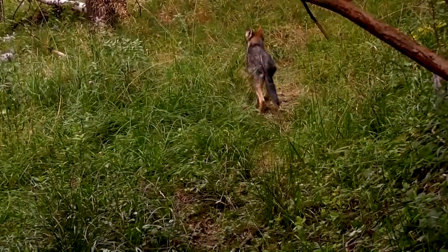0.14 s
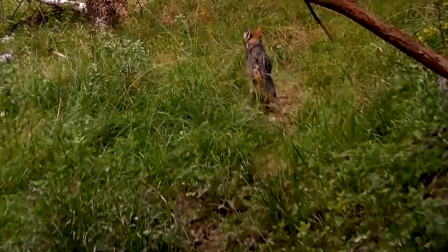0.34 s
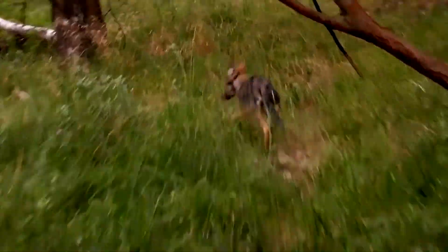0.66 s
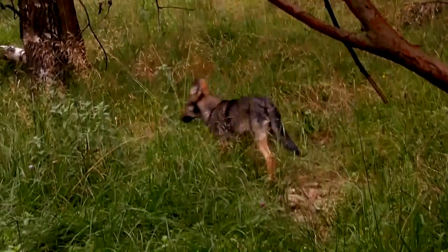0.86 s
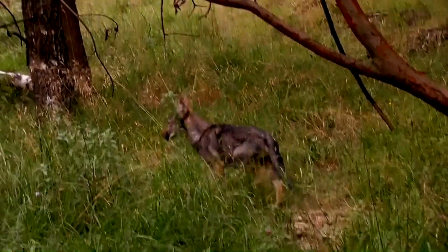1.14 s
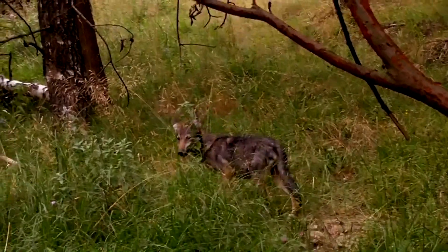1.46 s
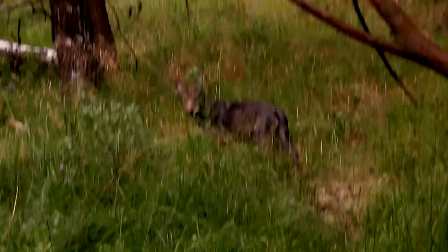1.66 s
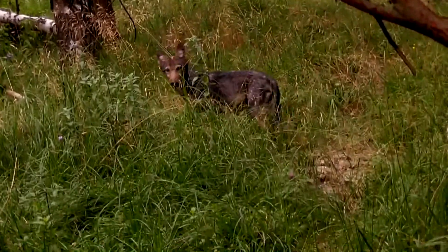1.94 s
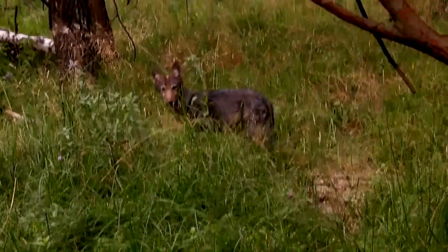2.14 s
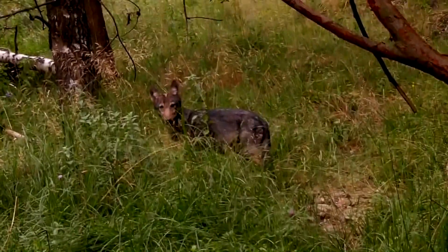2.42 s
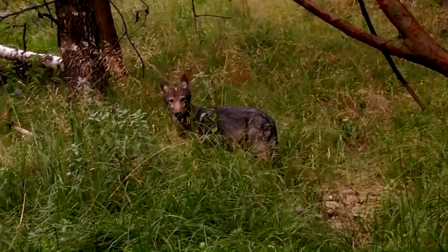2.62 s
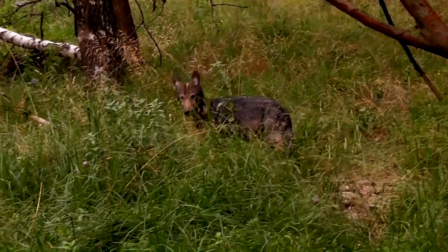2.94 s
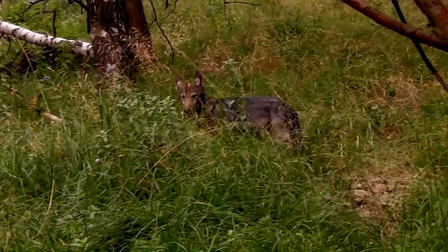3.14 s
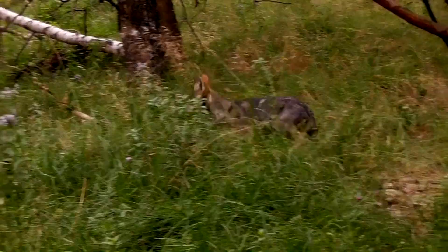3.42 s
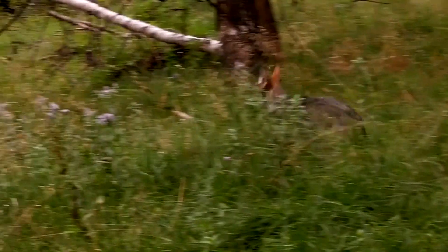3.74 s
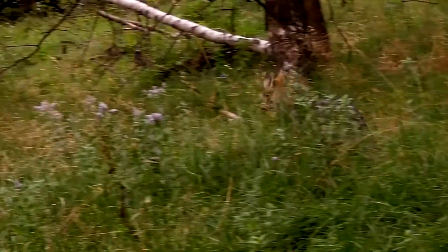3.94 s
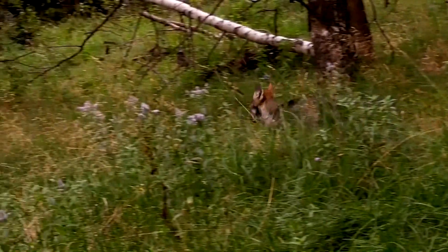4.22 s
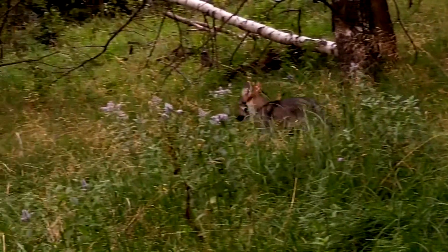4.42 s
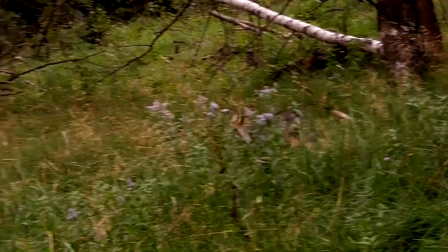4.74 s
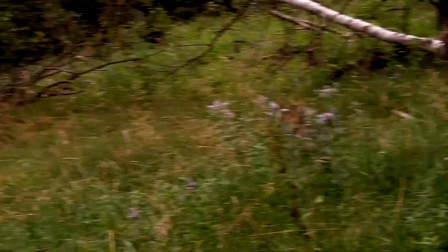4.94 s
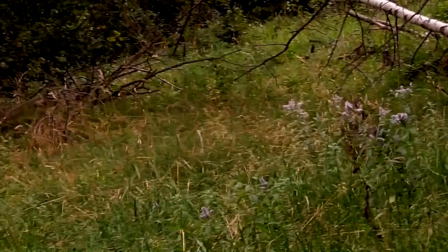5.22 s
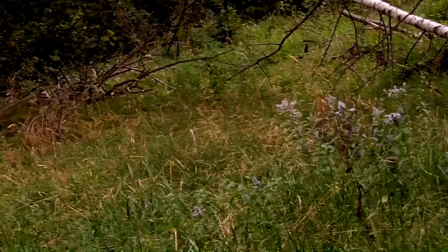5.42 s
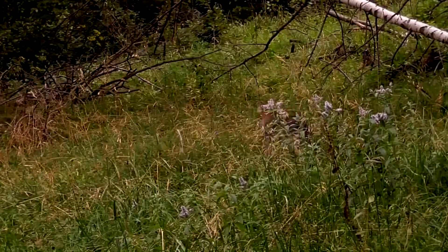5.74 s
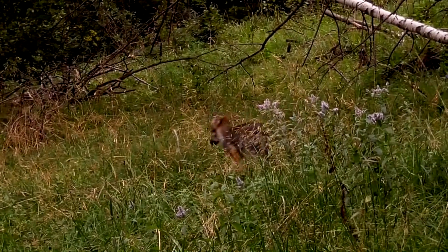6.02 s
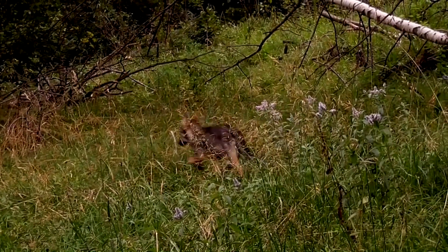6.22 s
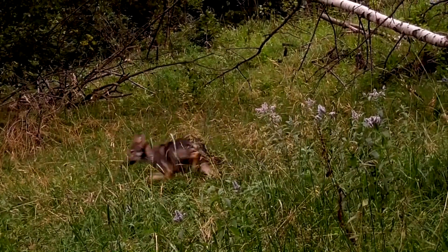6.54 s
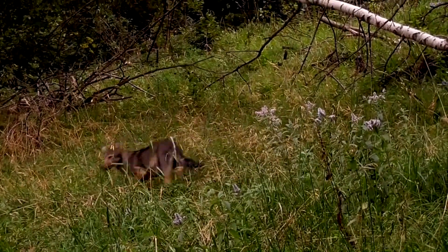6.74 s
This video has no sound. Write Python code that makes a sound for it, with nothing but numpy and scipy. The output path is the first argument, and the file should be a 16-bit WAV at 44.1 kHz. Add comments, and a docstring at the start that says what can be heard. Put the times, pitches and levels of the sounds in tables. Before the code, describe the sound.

In a quiet forest clearing, a small wild dog moves through long grass. Dry stems crackle, then one twig snaps sharply and loudly near one and a half seconds, with a much softer snap later. Brief bird chirps follow, and the grass swishes grow fuller. A hand-held stereo camera microphone adds faint hiss, dull bumps, low rumble and rapid lens-motor ticking.

```python
"""Quiet air and a thin bird whistle open a forest clearing; then dry stems start to crack in long grass.
A small wild dog wades through: strides are swelling grains of noise, cracks and two close twig snaps
are decaying modes under bursts of noise. A hand-held camera adds rumble and bumps (filtered noise, low
modes), lens motor ticks (struck modes) and a wavering hum; birds are gliding tones and hoarse notes."""
import sys
import numpy as np
from scipy import signal
from scipy.fft import rfft, irfft, next_fast_len
from scipy.io import wavfile
from scipy.ndimage import uniform_filter1d

SR = 44100
rng = np.random.default_rng(int(sys.argv[2]) if len(sys.argv) > 2 else 0)


def transcribe(signal):
    """Save signal, clipped to [-1, 1], as a 16-bit WAV file at the path in sys.argv[1]."""
    frames = np.atleast_2d(signal).T
    limited = np.clip(frames, -1, 1)
    pcm = np.round(limited * 32767).astype(np.int16)
    wavfile.write(sys.argv[1], SR, pcm)


N = 303035
T = np.arange(N) / SR
SIDES = np.array([[1], [-1]])  # left, right


def undb(db):
    """Turn decibels into an amplitude factor."""
    return 10 ** (np.asarray(db) / 20)


def unit(x):
    """Scale a signal to an RMS of one."""
    return x / np.sqrt(np.mean(x ** 2))


def on_log(hz, table):
    """Read an (f/Hz, value) table along a log-frequency axis."""
    f, v = np.transpose(table)
    return np.interp(np.log(np.maximum(hz, 1)), np.log(f), v)


def walk(rate):
    """Random levels held 1 / rate s and smoothed twice; spread near 1."""
    k = int(SR / rate)
    held = np.repeat(rng.standard_normal(N // k + 1), k)
    return 1.5 * uniform_filter1d(uniform_filter1d(held, k), k)[:N]


def colour(x, table):
    """Shape a signal by a spectrum that is silent outside its table."""
    size = next_fast_len(N)
    hz = np.arange(size // 2 + 1) * SR / size
    inside = (hz > table[0][0]) & (hz < table[-1][0])
    return irfft(rfft(x, size) * undb(on_log(hz, table)) * inside, size)[..., :N]


def spread(mid, side, like):
    """Make left and right of a given correlation from two independent noises."""
    return np.sqrt(1 + like) * mid + np.sqrt(1 - like) * side * SIDES


def pair(like, grain_db=0., share=1.):
    """Stereo noise of given correlation; a share of its samples are grains, stronger by grain_db."""
    x = rng.standard_normal((2, N))
    x *= np.where(rng.random(N) < share, undb(grain_db), 1)
    return spread(*x, like)


def decay(t, t60):
    """Exponential fade that falls 60 dB in t60 seconds."""
    return np.exp(-np.log(1000) * t / t60)


def ring(hz, t60, turn, length=.12):
    """One decaying mode that starts at the given fraction of its cycle."""
    t = np.arange(int(length * SR)) / SR
    return np.sin(2 * np.pi * (hz * t + turn)) * decay(t, t60)


def add(out, x, s):
    """Mix x into out from time s on."""
    i = int(s * SR)
    out[:, i:i + x.shape[-1]] += x[..., :N - i]


# Spectrum of the blades' hiss: (f/Hz, relative level/dB per Hz)
BLADE_SPECTRUM = [(4500, -20), (6500, -11), (8200, -2), (10000, 1), (12200, -3.5), (14500, -14)]
# Spectrum of the stalks' rustle: (f/Hz, relative level/dB per Hz)
STALK_SPECTRUM = [(600, -14), (1300, -8.5), (2300, -4.5), (3000, -7.5), (4600, -2.5), (6300, -7.5),
                  (9000, -15.5)]
# Strides through the grass: (peak t/s, swell t/s, fade t/s, blade hiss level/dB, stalk rustle level/dB)
STRIDES = [(.26, 0.11, .16, -66.5, -79), (.6, 0.063, 0.11, -72.5, -76), (.86, .06, 0.044, -70, -71),
           (1.17, 0.11, 0.14, -71, -72.5), (1.67, 0.07, 0.034, -75, -74.5), (1.84, 0.084, 0.12, -70, -69),
           (1.95, 0.028, 0.084, -61, -58.5), (2.37, 0.059, 0.088, -74, -71), (3.12, .04, 0.048, -69, -92),
           (3.35, .08, 0.11, -71, -80), (3.68, .03, .12, -64, -73.5), (4.0, 0.033, 0.083, -59, -68),
           (4.21, 0.027, 0.065, -59.5, -73), (4.34, 0.086, 0.076, -60, -67), (4.69, .12, 0.072, -58, -65.5),
           (4.93, 0.08, 0.058, -58.5, -66), (5.27, 0.1, 0.03, -65, -67.5), (5.57, 0.041, 0.033, -64, -69),
           (5.86, .025, 0.092, -60, -67.5), (6.15, 0.063, 0.059, -60, -67), (6.5, 0.047, 0.15, -65, -71),
           (6.63, 0.028, .05, -58.5, -67.5), (6.82, 0.15, 0.12, -60, -65.5)]
# Grass settling between strides: (t/s, blade hiss level/dB, stalk rustle level/dB)
SETTLING = [(0, -70, -75.5), (.9, -76.5, -76), (1.5, -86.5, -87), (2.1, -75, -78), (2.9, -89.5, -90),
            (3.8, -72, -80), (5.0, -71, -72.5), (6.0, -70.5, -71.5), (6.87, -69, -91)]


def grass():
    """Blades hiss high, stalks rustle lower: tiny scrapes that swell and fade with each stride."""
    s, *rest_db = np.transpose(SETTLING)
    power = np.array([undb(np.interp(T, s, db)) ** 2 for db in rest_db])
    for peak_s, swell_s, fade_s, *db in STRIDES:
        # a bell-shaped swell, with its own width on each side of the peak
        away = (T - peak_s) / np.where(T < peak_s, swell_s, fade_s)
        power = power + undb(db)[:, None] ** 2 * np.exp(-2 * away ** 2)
    blades = unit(colour(pair(0.46, grain_db=13, share=0.027), BLADE_SPECTRUM))
    blades = blades * undb(1.4 * walk(21))
    stalks = unit(colour(pair(0.76, grain_db=14, share=0.0055), STALK_SPECTRUM))
    stalks = stalks * undb(1.8 * walk(25))
    return np.sqrt(power[0]) * blades + np.sqrt(power[1]) * stalks


# Stem cracks, crackle levels taken before the band filter: (t/s, left minus right level/dB,
# low ring level/dB, ring f/Hz, middle crackle level/dB, middle f/Hz, high crackle level/dB)
CRACKS = [(.16, 0, -39, 610, -47, 3130, -60), (.206, -9, -45, 950, -62.5, 4900, -57.5),
          (.285, 6, -49, 1260, -50, 2130, -53), (.327, 2, -60.5, 877, -49, 2200, -53),
          (.53, -4, -44, 920, -60, 3830, -59), (.841, 3, -43.5, 914, -46.5, 2200, -42),
          (0.878, 5, -50.5, 908, -47.5, 2060, -47), (1.015, 0, -64, 900, -64, 4000, -46),
          (1.069, 2, -55, 630, -52, 2530, -42), (1.092, 0, -62, 900, -54.5, 4130, -59),
          (1.123, 4, -43, 930, -53, 2550, -50.5), (1.172, 2, -45, 947, -37.5, 5030, -55),
          (1.201, 1, -47, 880, -56, 5190, -50), (1.325, -3, -65, 885, -68, 5050, -40.5),
          (1.332, 3, -38.5, 890, -48, 2230, -58), (1.441, 0, -36.5, 890, -48, 2330, -28),
          (1.529, -1, -60, 452, -61.5, 3900, -50), (1.545, -6, -43, 651, -59.5, 2130, -56.5),
          (1.637, 0, -66, 764, -59, 4090, -46), (1.685, -1, -49, 580, -53.5, 5070, -53),
          (1.761, 3.5, -39.5, 873, -42, 2260, -36), (1.929, 4, -47, 940, -48, 5200, -29),
          (2.064, 0, -54, 468, -57, 4010, -47), (2.1, 0.5, -45.5, 840, -52.5, 2380, -58),
          (2.365, 5, -57, 744, -48.5, 3080, -53), (2.423, 10, -55, 900, -53.5, 3620, -55),
          (2.542, -1.5, -49, 806, -64, 2420, -62), (2.705, 0, -66, 840, -54, 3060, -48),
          (2.787, -2.5, -46, 565, -62, 4570, -59), (3.071, -2, -45.5, 840, -71, 4940, -53),
          (3.335, 3, -50.5, 1040, -49, 2160, -50), (3.973, 0, -67, 886, -60, 5400, -42),
          (5.149, 0, -42.5, 544, -58, 4550, -57), (5.277, -10, -45.5, 970, -58, 4500, -55),
          (5.295, -7, -48, 1150, -68, 2200, -60), (5.34, 1, -43, 857, -54, 2140, -54),
          (5.385, -1, -41, 545, -53, 2500, -55), (5.508, 0, -31.5, 860, -42, 2540, -64),
          (5.547, -11, -51, 780, -61, 5190, -58), (5.651, -8, -45.5, 880, -66, 2170, -56),
          (5.69, -4, -41, 754, -50, 2480, -57), (5.704, 1, -42, 790, -51.5, 3900, -60),
          (5.754, -5, -42.5, 600, -54.5, 3450, -59), (6.23, -7, -45.5, 900, -44.5, 3650, -41.5),
          (6.704, -9, -43, 870, -54, 3900, -52)]
# Low modes of a stem: (multiple of its ring pitch, t60/s, relative level/dB)
STEM_MODES = [(1, 0.034, -1), (.62, 0.013, -2.5), (1.4, 0.021, -2.5)]
# Middle crackle, then high crackle: (width each side/octaves, t60/s)
CRACKLE_BANDS = [(1, 0.023), (0.43, 0.0097)]
TEAR_S, HIGH_CRACKLE_HZ = 0.00089, 9900  # onset of each crack; centre of the high crackle
WALL_KNOCK_DB = -4.5  # knock against the middle crackle's level


def cracks():
    """Each stem rings low, out of step at the two microphones, under a burst of splitting fibre."""
    out = np.zeros((2, N))
    size = 2048
    chance = rng.random((len(CRACKS), 6))
    fibre = rng.standard_normal((len(CRACKS), 2, 2, size))
    t = np.arange(size) / SR
    rise = np.minimum(t / TEAR_S, 1)
    for crack, c, noise in zip(CRACKS, chance, fibre):
        s, pan_db, low_db, low_hz, middle_db, middle_hz, high_db = crack
        leading = np.sign(c[3] - .5) * SIDES  # which microphone runs ahead in phase
        x = np.zeros((2, size))
        for n, (multiple, t60, db) in enumerate(STEM_MODES):
            turn = c[n] + (0.079 + 0.088 * c[n + 3]) * leading
            x += undb(low_db + db) * ring(low_hz * multiple, t60, turn)[:, :size] * rise
        levels_db, centres_hz = (middle_db, high_db), (middle_hz, HIGH_CRACKLE_HZ)
        for (wide, t60), db, hz, (mid, side) in zip(CRACKLE_BANDS, levels_db, centres_hz, noise):
            sos = signal.butter(2, [hz / 2 ** wide, hz * 2 ** wide], "band", fs=SR, output="sos")
            burst = (mid + .45 * side * SIDES) * rise * decay(t, t60)
            x += undb(db) * signal.sosfilt(sos, burst)
        # the stem wall also knocks briefly at the middle pitch
        x += undb(middle_db + WALL_KNOCK_DB) * ring(middle_hz, .018, c[0])[:size] * rise
        add(out, x * undb(pan_db * SIDES / 2), s)
    return out


# Twig snaps: (t/s, overall level/dB, tear t/s, relative splinter level/dB, splinter t60/s, splinter top f/Hz)
SNAPS = [(1.4295, -5.5, 0.00063, -16, 0.016, 13200), (2.851, -22.5, 0.00047, -11.5, 0.028, 4970)]
# One list of modes for each twig: (f/Hz, t60/s, left relative level/dB, right relative level/dB)
TWIG_MODES = [
    [(110, .12, -44.5, -30), (330, 0.022, -40, -34.5), (436, .05, -41, -30), (630, .025, -24.5, -28),
     (810, 0.031, -7.5, -20), (1006, 0.037, -14.5, -27), (1185, 0.036, -25, -23), (1420, 0.023, -23.5, -26),
     (2290, 0.015, -26, -29), (3100, 0.019, -33, -31), (4036, 0.00616, -0.5, -1.5),
     (5250, 0.0053, -13.5, -15.5), (6040, 0.015, -20.5, -18.5), (7540, 0.0062, -14.5, -16),
     (9210, .006, -1, -3), (11500, 0.0016, -15.5, -0.5), (14900, 0.0036, -16, -11.5)],
    [(500, 0.026, -22, -29), (830, 0.039, -21, -19.5), (1040, 0.033, -10.5, -21), (1350, 0.013, -19, -0.5),
     (2010, 0.03, -12.5, -12.5), (2600, 0.0056, -3, -2), (3280, 0.0075, -21, -4), (4040, 0.011, -1.5, 2),
     (5360, 0.013, -25, -14), (6200, 0.0096, -19, -15), (8200, 0.0066, -18, -10.5),
     (10600, 0.0079, -24, -20)],
]


def snaps():
    """A twig tears through, ringing its modes, and splinters spit in a decaying, flickering noise."""
    out = np.zeros((2, N))
    size = 4096
    t = np.arange(size) / SR
    for (s, db, tear_s, splinter_db, splinter_t60, top_hz), modes in zip(SNAPS, TWIG_MODES):
        x = np.zeros((2, size))
        for (hz, t60, left_db, right_db), turn in zip(modes, rng.random(len(modes))):
            # the two microphones hear each mode a little out of step
            x += undb([[left_db], [right_db]]) * ring(hz, t60, turn + 0.084 * SIDES)[:, :size]
        noise = rng.standard_normal((2, size))
        flicker = undb(5.7 * np.repeat(rng.standard_normal(size // 32), 32))
        mid, side = noise * flicker
        splinter = (mid + .6 * side * SIDES) * decay(t, splinter_t60)
        band = signal.butter(3, [2200., top_hz], "band", fs=SR, output="sos")
        x += undb(splinter_db) * signal.sosfilt(band, splinter)
        x *= np.minimum(2 * t / tear_s, 1)  # full strength halfway through the tear
        # a thin twig sends out little bass
        x = signal.sosfilt(signal.butter(2, 70., "high", fs=SR, output="sos"), x)
        add(out, x * undb(db), s)
    return out


# Hand and feet: (t/s, casing rumble level/dB, shuffle level/dB)
GRIP_LEVELS = [(0, -80, -62.5), (.25, -67, -65.5), (.5, -73, -64.5), (.85, -59.5, -64), (.95, -76, -64.5),
               (1.15, -65.5, -62.5), (1.35, -82, -66), (1.75, -66.5, -66), (1.95, -67, -58.5),
               (2.25, -71, -65.5), (2.4, -68.5, -60.5), (2.65, -69.5, -66), (3.2, -74, -65.5),
               (4.3, -69.5, -67.5), (5.0, -70.5, -65.5), (5.15, -61, -60), (5.3, -59.5, -61),
               (5.55, -66, -60), (5.7, -62, -60.5), (6.2, -75, -66), (6.55, -68, -63), (6.75, -61.5, -58.5),
               (6.87, -64, -60)]
# Spectrum of the casing rumble: (f/Hz, relative level/dB per Hz)
CASING_SPECTRUM = [(25, -25.5), (50, -16), (85, -9.5), (135, -1), (200, 2), (400, -13.5)]
# Spectrum of the shuffling feet: (f/Hz, relative level/dB per Hz)
SHUFFLE_SPECTRUM = [(200, -18.5), (500, 1.5), (900, 1), (1300, -2), (2200, -21)]
# Dull bumps on the casing: (t/s, level/dB, f/Hz, t60/s, left minus right level/dB)
BUMPS = [(.16, -42.5, 143, 0.087, -7), (0.244, -44, 140, 0.059, -7), (.355, -47, 155, 0.081, -10),
         (1.763, -47.5, 132, 0.14, -11), (2.101, -46.5, 133, 0.11, -10), (2.7, -53, 125, 0.11, -12),
         (5.072, -57, 134, 0.28, -13), (5.146, -49.5, 135, 0.23, -17), (5.295, -41, 133.5, 0.21, -12),
         (5.387, -47.5, 116, 0.16, -10), (5.47, -47, 128, 0.14, -9), (5.688, -49, 135, 0.09, -13),
         (6.719, -50, 150, 0.09, -7)]


def grip():
    """The hand rumbles and bumps on the casing nearer the right microphone; feet shuffle in litter."""
    s, rumble_db, shuffle_db = np.transpose(GRIP_LEVELS)
    rumble = unit(colour(pair(0.15), CASING_SPECTRUM)) * undb(2.8 * walk(7.8) - 1.6 * SIDES)
    shuffle = unit(colour(pair(0.049, grain_db=14, share=0.0031), SHUFFLE_SPECTRUM))
    shuffle = shuffle * undb(2.5 * walk(45))
    out = undb(np.interp(T, s, rumble_db)) * rumble + undb(np.interp(T, s, shuffle_db)) * shuffle
    for s, db, hz, t60, pan_db in BUMPS:
        x = ring(hz, t60, 0.074 * SIDES, .3)
        # the casing also rocks at about half the pitch
        x = x + undb(-8.0) * ring(0.55 * hz, t60, 0.18 * SIDES, .3)
        # a soft palm: the push takes 0.8 of a cycle to build
        push = np.minimum(np.arange(x.shape[1]) * hz / (.8 * SR), 1)
        add(out, x * push * undb(db + pan_db * SIDES / 2), s)
    return out


# Lens motor runs: (first step t/s, run end t/s, steps per second)
LENS_RUNS = [(.403, .57, 50), (.604, .89, 25), (.917, .96, 50), (2.417, 6.87, 50)]
# Strength of the steps: (t/s, barrel's low-mode level/dB, barrel's high-mode level/dB)
LENS_LEVELS = [(.4, -57, -55), (.5, -51.5, -56.5), (.72, -49, -53), (.96, -52, -56), (2.4, -58, -60),
               (3.2, -63.5, -72), (3.8, -61.5, -65.5), (4.4, -56.5, -66), (4.9, -52.5, -57),
               (5.4, -56, -66), (5.9, -52, -57), (6.3, -57.5, -64), (6.6, -86, -76)]
# Modes of the lens barrel: (f/Hz, t60/s, relative level/dB)
BARREL_MODES = [(740, 0.0068, 6), (1277, 0.025, -3), (1523, 0.016, 0.5), (2008, 0.0092, -0.5),
                (2200, 0.0071, -12), (3560, 0.0047, 6), (4660, 0.0049, 6), (5800, .003, -2)]
# Phase offset at each microphone, in opposite directions: (low modes [cycles], high modes [cycles])
LENS_SKEW = (.07, 0.12)
LENS_HIGH_HZ = 3000  # modes above this follow the high level


def lens():
    """The focus motor steps in steady runs of uneven strength, each step knocking the lens barrel."""
    times = np.concatenate([np.arange(a, b, 1 / rate) for a, b, rate in LENS_RUNS])
    uneven_db = 1.9 * rng.standard_normal(len(times))
    s, *levels_db = np.transpose(LENS_LEVELS)
    out = np.zeros((2, N))
    for high, level_db in enumerate(levels_db):
        steps = np.zeros(N)
        steps[(times * SR).astype(int)] = undb(np.interp(times, s, level_db) + uneven_db)
        knock = sum(undb(db) * ring(hz, t60, LENS_SKEW[high] * SIDES, .03)
                    for hz, t60, db in BARREL_MODES if (hz > LENS_HIGH_HZ) == high)
        knock *= np.minimum(np.arange(knock.shape[1]) / (0.001 * SR), 1)  # 1 ms onset
        out += signal.fftconvolve(steps[None], knock, axes=1)[:, :N]
    return out


# The motor hums while it runs hard: (t/s, f/Hz, level/dB)
HUM = [(.34, 150, -80), (.37, 159.6, -66), (.48, 192.2, -62.5), (.57, 183.5, -62), (.64, 220, -68),
       (.71, 249, -58), (.76, 199.7, -68), (.81, 165, -62), (.87, 196, -64), (.9, 200, -84)]


def hum():
    """A low tone wavering in pitch and level through the casing, out of step at the two microphones."""
    s, hz, db = np.transpose(HUM)
    turn = np.cumsum(np.interp(T, s, hz) * (1 + 0.04 * walk(39.2))) / SR
    on = (T > s[0]) & (T < s[-1])
    level = np.sqrt(2) * undb(np.interp(T, s, db) + 2.3 * walk(25.6))
    return on * level * np.sin(2 * np.pi * (turn + 0.1 * SIDES))


# Bird whistles, a negative fade grows: (start t/s, length t/s, from f/Hz, to f/Hz, glide t/s,
# starting level/dB, fade/dB per s)
WHISTLES = [(0.042, 0.12, 8400, 7850, 0.068, -69.5, -21), (2.636, .135, 3030, 4610, .042, -64.5, 100),
            (2.648, .028, 5000, 6000, .03, -77, 50), (5.05, .08, 2980, 4630, 0.078, -80, -50)]
# Hoarse falling bird notes: (start t/s, end t/s, from f/Hz, to f/Hz, width f/Hz, level/dB before swell)
RASPS = [(3.04, 3.2, 8200, 6500, 500, -65.5), (3.1, 3.27, 7300, 5400, 450, -71),
         (3.09, 3.28, 5700, 4200, 400, -72), (3.3, 3.33, 7700, 7500, 300, -75)]
WHISTLE_EDGE_S, WHISTLE_FLUTTER_DB = 0.0048, 0  # fade in and out; level flutter (0 = steady)


def birds():
    """Thin gliding whistles and hoarse noise-modulated notes from the trees, with a blur of echoes."""
    out = np.zeros(N)
    flutter_db = WHISTLE_FLUTTER_DB * walk(70)
    for s, length_s, from_hz, to_hz, glide_s, db, fade_db in WHISTLES:
        t = np.clip(T - s, 0, length_s)
        # the glide slows as it nears the held pitch
        hz = from_hz + (to_hz - from_hz) * np.sin(np.pi / 2 * np.minimum(t / glide_s, 1))
        edge = np.minimum(np.minimum(t, length_s - t) / WHISTLE_EDGE_S, 1)
        tone = np.sin(2 * np.pi * np.cumsum(hz) / SR)
        out += edge * np.sqrt(2) * undb(db - fade_db * t + flutter_db) * tone
    for a, b, from_hz, to_hz, wide_hz, db in RASPS:
        u = np.clip((T - a) / (b - a), 0, 1)
        husk = unit(uniform_filter1d(rng.standard_normal(N), int(SR / wide_hz)))
        tone = np.sin(2 * np.pi * np.cumsum(from_hz + (to_hz - from_hz) * u) / SR)
        out += undb(db) * np.sin(np.pi * u ** 0.54) * husk * tone
    t = np.arange(SR // 5) / SR
    trees = undb(-37.0) * rng.standard_normal((2, len(t))) * np.exp(-t / 0.05)
    return out + signal.fftconvolve(out[None], trees, axes=1)[:, :N]


# Spectrum of the air: (f/Hz, relative level/dB per Hz)
AIR_SPECTRUM = [(15, -45), (25, -19), (162, -3), (331, 0), (388, 3), (491, -8.5), (901, -5.5), (1370, -18),
                (1490, -10), (1840, -21.5), (2720, -23), (4620, -24.5), (6170, -26.5), (10200, -18),
                (13600, -24)]
# Stereo likeness of the air: (f/Hz, left-right correlation)
LIKENESS = [(60, 0.58), (400, 0.057), (1400, 0.21), (3000, 0.18), (14000, 0.42)]
# Stereo lean of the air: (f/Hz, left minus right level/dB)
LEAN = [(60, -3), (200, -5.5), (1300, 2.5), (8000, -0.5)]
AIR_DB = -60.5


def air():
    """Quiet air and microphone hiss: noise in overlapping octave bands that waver a little."""
    swell = walk(0.27)  # slow, shared by all bands
    size = next_fast_len(N)
    f = np.arange(size // 2 + 1) * SR / size
    mid, side = rfft(rng.standard_normal((2, size))) * undb(on_log(f, AIR_SPECTRUM))
    both = spread(mid, side, on_log(f, LIKENESS)) * undb(on_log(f, LEAN) * SIDES / 2)
    octave = np.log2(np.maximum(f, 1) / 20)
    out = np.zeros((2, N))
    for k in range(10):
        band = np.clip(1 - abs(octave - k - .5), 0, 1)
        out += irfft(both * band, size)[:, :N] * undb(0.26 * swell + 0.67 * walk(9))
    return unit(out) * undb(AIR_DB)


FAINT_TOP_HZ, TOP_HZ = 13600, 16750  # treble limit of the faint layers; of everything


def scene():
    """Mix the layers; the faint ones end lower in the treble than the loud snaps."""
    faint = air() + grass() + grip() + cracks() + lens() + hum() + birds()
    faint = signal.sosfilt(signal.ellip(10, .2, 70, FAINT_TOP_HZ, fs=SR, output="sos"), faint)
    return faint + snaps()


def record(dry):
    """The camera rolls off the deepest bass and cuts the top."""
    dry = signal.sosfilt(signal.butter(2, 38., "high", fs=SR, output="sos"), dry)
    return signal.sosfilt(signal.ellip(10, .2, 80, TOP_HZ, fs=SR, output="sos"), dry)


dry = scene()
out = record(dry)
transcribe(out)
```